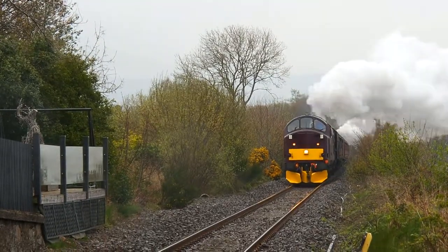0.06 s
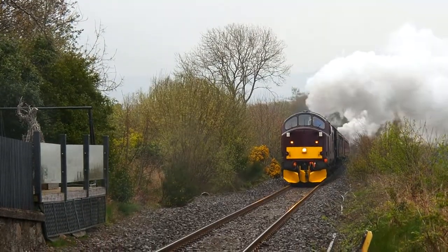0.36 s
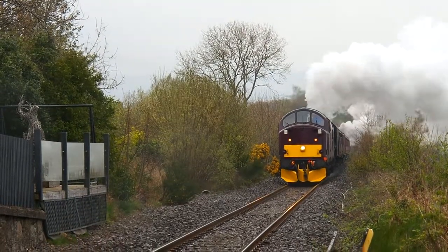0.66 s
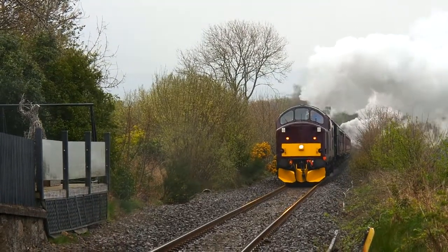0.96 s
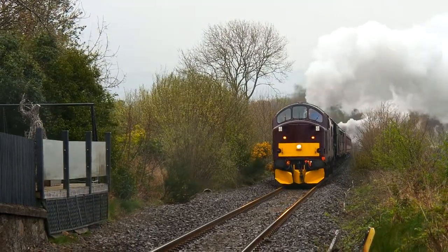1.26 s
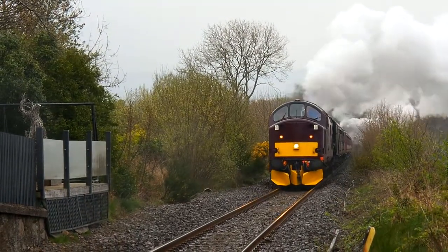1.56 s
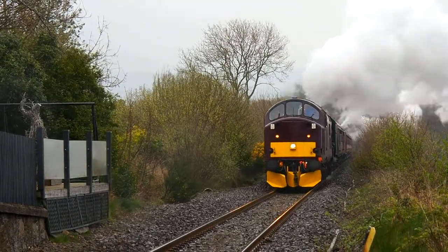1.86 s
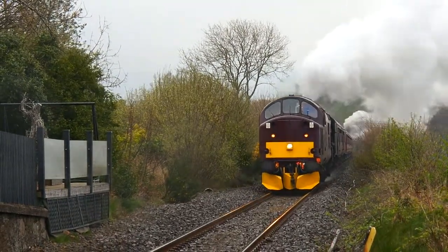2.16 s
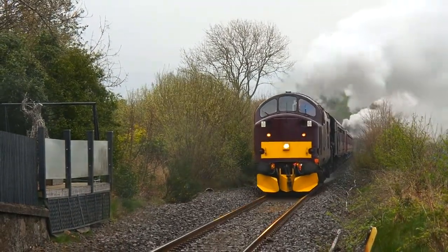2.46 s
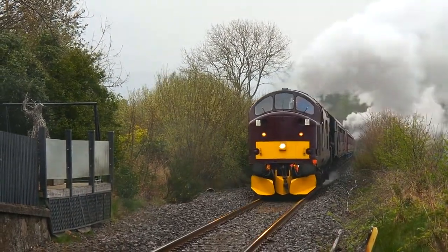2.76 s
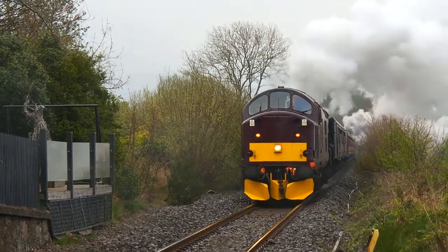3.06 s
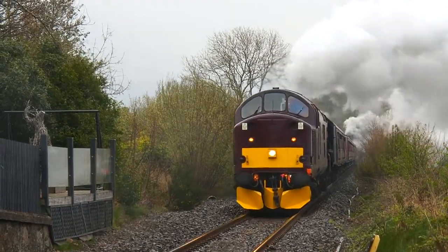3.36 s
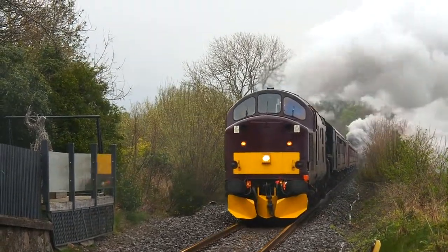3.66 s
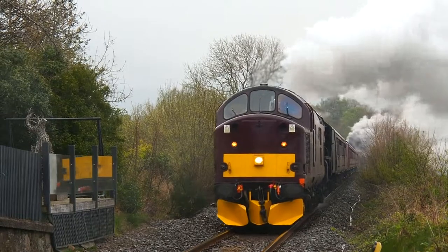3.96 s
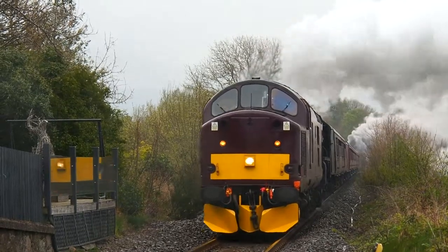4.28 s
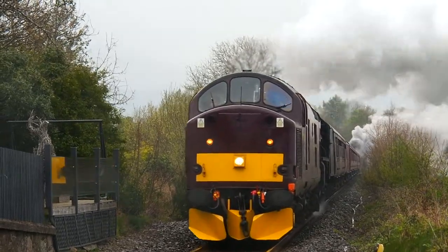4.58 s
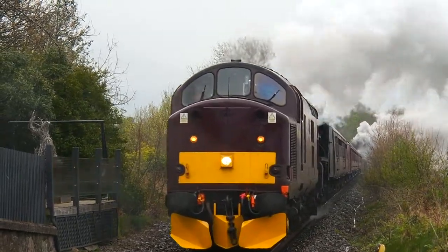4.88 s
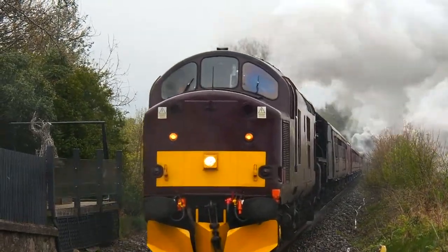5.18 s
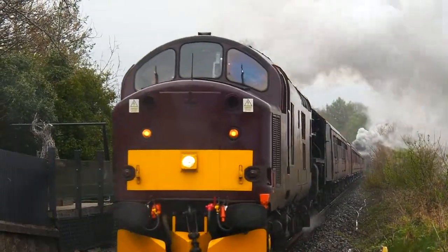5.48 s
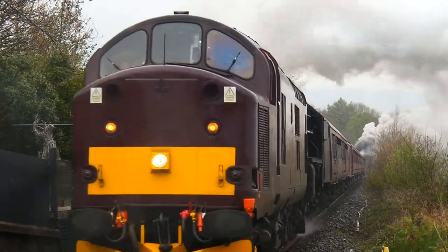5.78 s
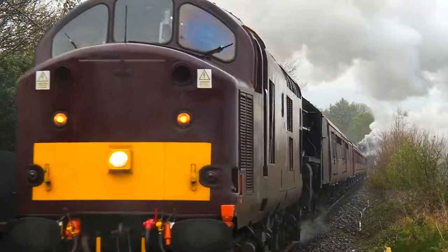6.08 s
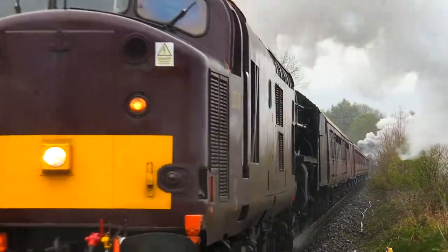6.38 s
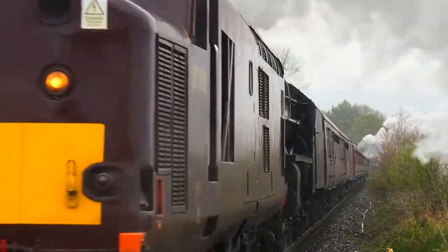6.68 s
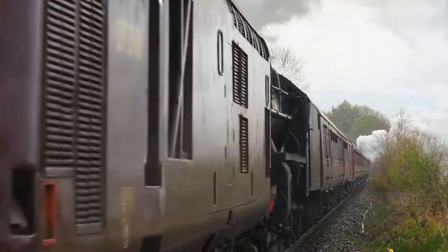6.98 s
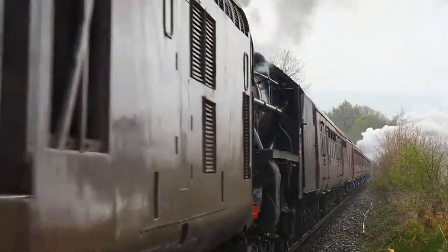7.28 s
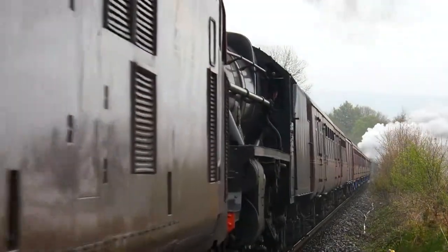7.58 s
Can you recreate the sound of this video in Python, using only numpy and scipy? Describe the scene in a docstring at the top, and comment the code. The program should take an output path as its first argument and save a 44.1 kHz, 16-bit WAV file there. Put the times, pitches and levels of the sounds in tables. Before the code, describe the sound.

A diesel locomotive approaches under heavy load, heard outdoors from beside the track. From the start its exhaust makes a deep, fast, uneven throb, fairly distant, with soft wheel roar and a gassy rasp above it. The sound grows steadily louder. The clatter surges briefly at about 1 second and again around 3.5 seconds, with a few light ticks, while faint gear and turbocharger whines come and go. From about 5.5 seconds the engine is close and a quick metallic rattle sets in. Between roughly 6.8 and 7.4 seconds the engine passes right by, with rapid knocks from its steel casing, sharp spits of gas and a bright pulsing hiss. Hard exhaust beats follow, and the wheel roar swells with a short rising ring around 7.5 seconds. It is still loud when the sound stops at about 7.7 seconds.

```python
"""Diesel locomotive at full power

A twelve-cylinder locomotive climbs towards the listener. Uneven firings throb in the exhaust once per
engine cycle; gas rasps and spits. Each source grows by its own distance law; the clatter comes in surges,
and gears and turbocharger sing faintly. The engine room rattles and knocks as it goes by, and the wheels
roar as the first bogie draws level."""
import sys
import numpy as np
from scipy import signal
from scipy.fft import rfft, irfft, next_fast_len
from scipy.io import wavfile
from scipy.ndimage import uniform_filter1d

SR = 44100
rng = np.random.default_rng(int(sys.argv[2]) if len(sys.argv) > 2 else 0)


def master_out(mix):
    """Clip the mix to full scale and print it as 16-bit PCM to the path in sys.argv[1]."""
    frames = np.transpose(np.atleast_2d(mix))
    ceiling = np.clip(frames, -1, 1)
    pcm = np.round(ceiling * 32767).astype(np.int16)
    wavfile.write(sys.argv[1], SR, pcm)


N = 340893
TIME = np.arange(N) / SR
FFT_SIZE, BURST_SIZE = next_fast_len(N), 2048
BIN_HZ = np.maximum(np.arange(FFT_SIZE // 2 + 1) * SR / FFT_SIZE, 1)
BURST_HZ = np.maximum(np.arange(BURST_SIZE // 2 + 1) * SR / BURST_SIZE, 1)
BURST_AGE_S = np.arange(BURST_SIZE) / SR
ENGINE_ROOM_S = (6.8, 7.35, 0.19)  # going by: start, end, edge


# Each row, in firing order: blow strength in dB far, near.
CYLINDERS = [(-7.5, -8), (-4.5, -4), (-3, -8), (-1.75, -5), (-10.5, -5), (-5.5, -2), (0.5, -11), (-7, -5),
             (0, -15), (-14.5, -8), (-7, -8), (-7.5, -2)]
# Each row (far, near): first firing and second-bank lag in firing gaps, pipe smear in radians.
FIRING = [(.4805, .645, .032), (.399, .386, .029)]

def firing_sum(order, near):
    """Phasor of twelve blows at one engine order; the banks fire unevenly, the pipes smear each blow."""
    first, bank_lag, smear = FIRING[near]
    slot = np.arange(len(CYLINDERS))
    firings = (slot + first + bank_lag * (slot % 2)) / len(CYLINDERS)
    total = np.sum(undb(CYLINDERS)[:, near] * np.exp(-2j * np.pi * order * firings))
    return total * np.exp(-1j * smear * (order - 20) ** 2)


# Each row, from engine order 5 up: relative level in dB far, near, alongside.
ORDER_LEVELS = [(-36.0, -36.0, -36.0), (-15.5, -16, -20.0), (-19, -18, -36.0), (-30.0, -26, -34.0),
                (-3.5, -9, -16.0), (-12, -18.0, -19), (-21, -20, -25.0), (-1.0, -6.5, -6.0),
                (-23, -9.5, -16), (-10.5, -8, -12.0), (-13, -16, -7), (-14.5, -5.5, -10.0),
                (-28.5, -10, -3), (-8.5, -17, -11), (0.0, 0.0, 0.5), (-6.5, -15, -21), (-1.5, -2.5, -3.5),
                (-8.5, -11, -11), (-5.5, -6.5, -3.5), (-11.5, -18, -12.0), (-15.0, -21, -19),
                (-12, -19, -7), (-9.5, -22, -7), (-3, -11.5, -5.5), (-17.5, -17, -6.5), (-17, -16.5, -7.0),
                (-18.5, -11, -11.5), (-18, -8.5, -5.5), (-39, -18, -15), (-20.5, -26.0, -32),
                (-25.5, -18.5, -19), (-30, -21.5, -18)]
# Highest order of each silencer register: bass, boom, bark.
TOP_ORDERS = [14, 24, 36]

def exhaust_tones(cycle, flutter_db=0.94, chug_db=0.7, alongside_s=6.9, blend_s=0.07):
    """Bass, boom and bark: the firing pattern sets each order's phase, the silencer its strength."""
    close, alongside = closeness(), closeness(alongside_s, blend_s)
    tones, power = np.zeros((3, N)), np.zeros((3, N))
    for order, (far_db, near_db, side_db) in enumerate(ORDER_LEVELS, 5):
        far, near = firing_sum(order, near=0), firing_sum(order, near=1)
        phase = np.angle(far) + close * np.angle(near / far)
        gain = undb(far_db + close * (near_db - far_db) + alongside * (side_db - near_db))
        register = np.searchsorted(TOP_ORDERS, order)
        tones[register] += gain * undb(flutter_db * walk(6)) * np.cos(2 * np.pi * order * cycle + phase)
        power[register] += gain ** 2 / 2
    return tones / np.sqrt(power) * undb(chug_db * walk(8))


# One spectrum per register. Each row: frequency in Hz, relative density in dB.
TURBULENCE = [
    [(28, -27), (48, -13), (65, -9), (100, 0), (118, -9.5)],
    [(115, -5), (165, -2.5), (190, -3.5)],
    [(192, -2.5), (215, 0.5), (240, -0.5), (265, -11.5), (300, -23.5), (400, -36)],
]
# Each row, one per register: turbulence against tone in dB far, near.
TURBULENCE_DB = [(-14.5, -7), (-9.5, -6.5), (-3, -0.5)]
# Each row: time in seconds, bass gain in dB.
BASS_SWELL = [(1.1, -2), (1.45, -0.5), (4, 1.4), (5.7, -2.5), (6.15, 2.5), (6.85, -1.5), (7.25, 2.5),
              (7.4, 1)]
# Each row: start and end in seconds, boom and bark gain in dB.
LULLS_AND_LIFTS = [(5.748, 6.25, 0, 2), (6.486, 6.783, 0, 3.5), (6.796, 6.926, -1.5, -0.5),
                   (7.05, 7.174, -2.5, -4.5), (7.176, 7.382, -3.5, 0), (7.543, 7.59, -2.5, -3.5),
                   (7.638, 7.717, 1.5, 0)]

def exhaust(cycle, throb=0.26):
    """Firing tones plus turbulent gas that rushes in each chug."""
    tones, close = exhaust_tones(cycle), closeness()
    chugs = unit(np.abs(uniform_filter1d(tones[1] ** 2, size=900)) ** (throb / 2))
    boom_db, bark_db = sum(np.outer(db, bout(start, end, 0.03)) for start, end, *db in LULLS_AND_LIFTS)
    gains = [passing(at_s=7, width_s=1.24, db=-24.5, fall=1.02) * undb(curves(BASS_SWELL)[0]),
             passing(at_s=7.5, width_s=1.57, db=-17, fall=1.5) * undb(boom_db),
             passing(at_s=7.5, width_s=0.21, db=-16, fall=0.78) * undb(bark_db)]
    out = 0
    for tone, gain, spectrum, (far_db, near_db) in zip(tones, gains, TURBULENCE, TURBULENCE_DB):
        rush_gain = undb(far_db + close * (near_db - far_db))
        rush = rush_gain * noise(spectrum, white() * chugs)
        direct = np.array([tone, np.zeros(N)])
        out += gain * (direct + rush) / np.sqrt(1 + rush_gain ** 2)
    return out


# Each row: start in seconds, peak in dB, ring in Hz.
HARD_FIRINGS = [(7.021, -9.5, 225), (7.204, -8.5, 237), (7.341, -8.5, 245), (7.383, -10, 170),
                (7.452, -4.5, 159), (7.510, -7, 201), (7.593, -7.5, 213), (7.642, -2, 165.6)]

def with_hard_firings(throb, swell_s=0.011, takeover=0.54):
    """A hard firing rings the silencer for a few cycles and takes over from the steady throb."""
    out, age = throb.copy(), np.arange(int(SR * 0.07)) / SR
    envelope = (age / swell_s * np.exp(1 - age / swell_s)) ** 2
    for s, db, hz in HARD_FIRINGS:
        span = slice(int(s * SR), int(s * SR) + len(age))
        out[:, span] *= 1 - takeover * envelope
        out[0, span] += undb(db) * envelope * np.sin(2 * np.pi * hz * age)
    return out


# Each row: frequency in Hz, relative density in dB.
WHEELS_FAR = [(360, -45), (620, -10), (662, -18), (720, 0), (841, 1), (919, -1), (1170, -6.5), (1410, -7),
              (1540, -4), (1640, -6), (1810, -16.5), (1900, -12.5), (2470, -23), (4180, -120)]
WHEELS_NEAR = [(360, -39), (560, -16), (620, -13.5), (710, -3), (841, -0.5), (1050, -6), (1150, -3.5),
               (1290, -8.5), (1570, -7.5), (1780, -11), (1900, -11), (2470, -36), (4180, -120)]

def wheel_roar(cycle):
    """Midrange roar; gives way to single knocks beside the engine room."""
    roar = clatter(cycle, WHEELS_FAR, WHEELS_NEAR, depth=0.24, flicker_db=0.48, ring_db=1)
    dip = undb(-4 * bout(*ENGINE_ROOM_S))
    return roar * dip * passing(at_s=7.5, width_s=0.6158, db=-26.5, fall=1.1131)


# Each row: start and end in seconds, first and last pitch in Hz, level in dB.
WHEEL_GLIDES = [(0.27, 0.378, 852, 770, -49), (1.0, 1.328, 830, 888, -49.5), (3.533, 3.61, 803, 883, -47),
                (7.501, 7.72, 699.5, 1099, -30.5)]

def wheel_glides(width_hz=110, edge_s=0.096):
    """The wheel roar gathers briefly in a narrow, sliding resonance."""
    out, lowpass = 0, signal.butter(2, width_hz / 2, fs=SR, output="sos")
    for start, end, from_hz, to_hz, db in WHEEL_GLIDES:
        hz = np.interp(TIME, [start, end], [from_hz, to_hz])
        carrier = np.exp(2j * np.pi * np.cumsum(hz) / SR)
        band = (signal.sosfilt(lowpass, white() + 1j * white()) * carrier).real
        out += unit(band) * undb(db) * bout(start, end, edge_s)
    return out


# Each row: frequency in Hz, relative density in dB.
BODY_FAR = [(270, -15), (305, -11.5), (345, -7.5), (400, -10.5), (432, -6), (482, -9.5), (554, -16.5),
            (620, -14), (680, -16)]
BODY_NEAR = [(270, -12.5), (315, -4.5), (350, -9), (395, -11), (436, -6), (458, -13.5), (482, -8),
             (554, -20), (620, -17.5), (680, -26)]

def body_rumble(cycle):
    """Low, nearly steady clatter of the body."""
    rumble = clatter(cycle, BODY_FAR, BODY_NEAR, depth=0.069, flicker_db=0.3, ring_db=0)
    return rumble * passing(at_s=7.5, width_s=0.58, db=-30.5, fall=0.98)


# Each row: frequency in Hz, relative density in dB.
RASP_FAR = [(1750, -2), (1830, -14), (1950, 0), (2130, 2.5), (2420, -0.5), (2730, 1), (2900, -5),
            (3120, -13), (3550, -10.5), (4050, -18), (4800, -20)]
RASP_NEAR = [(1750, -8), (1900, -3), (2130, 4), (2400, -1), (2700, -3.5), (2960, -11.5), (3350, -8),
             (3760, -24), (4800, -26)]

def gas_rasp(cycle):
    """Gas rasps in time with the puffs."""
    rasp = clatter(cycle, RASP_FAR, RASP_NEAR, depth=0.26, flicker_db=0.96, ring_db=1.84)
    return rasp * passing(at_s=7, width_s=1.51, db=-34.5, fall=1.33)


# Each row: frequency in Hz, relative density in dB.
HISS = [(2120, -21), (3600, 1.5), (3990, -1), (4850, -0.5), (5290, -6), (6120, -8.5), (7390, -6),
        (9210, -11), (10100, -9.5), (11500, -24), (12800, -33), (14500, -36), (15500, -42)]

def gas_hiss(cycle):
    """Pulsed hiss; gives way slightly to single spits beside the engine room."""
    hiss = clatter(cycle, HISS, HISS, depth=0.33, flicker_db=0.95, ring_db=2)
    dip = undb(-0.5 * bout(*ENGINE_ROOM_S))
    return hiss * dip * passing(at_s=7, width_s=1.07, db=-42, fall=1.56)


# Each row: frequency in Hz, relative density in dB.
FIZZ = [(10000, 3), (11200, 1), (12500, -16), (14300, -14), (15500, -21)]

def fizz():
    """The finest hiss carries only a few metres."""
    return noise(FIZZ, white()) * passing(at_s=7.18, width_s=0.22, db=-54.5, fall=1.9)


# Each row: start and length in seconds, wheel, rasp and hiss gain in dB.
SURGES = [(0.952, 0.48, 2, 3, 2), (2.458, 0.68, 0, -2, 0), (3.276, 0.19, 2.5, 3, 0.5),
          (3.488, 0.15, 4, 6, 5.5), (3.662, 0.16, 1.5, 3, 3.5), (3.903, 0.2, 1.5, 2.5, 1.5),
          (4.597, 0.48, 0.2, 1.5, 1.5), (5.65, 0.38, 3, 1.5, 2), (6.238, 0.11, 0, 0.5, 0.5),
          (6.4, 0.13, -0.5, -1.5, -2.5), (6.883, 0.14, 3.5, 2.5, 1), (7.417, 0.12, -0.5, 2.5, -1),
          (7.569, 0.16, 4.5, 2.5, 2)]

def surging_clatter(cycle, edge_s=0.14):
    """Wheel roar, rasp and hiss swell or sink for a moment."""
    surge_db = sum(np.outer(db, bout(start, start + length, edge_s)) for start, length, *db in SURGES)
    wheel_gain, rasp_gain, hiss_gain = undb(surge_db)
    return wheel_roar(cycle) * wheel_gain + gas_rasp(cycle) * rasp_gain + gas_hiss(cycle) * hiss_gain


# Relative strength in dB of each of the near bank's six puffs.
PUFFS_DB = [-2.5, -5, -0.5, -5.5, -1, -3]

def gas_puffs(cycle, lead_gaps=0.19, decay_gaps=0.84, scatter_db=3):
    """Envelope that jumps at each near-bank firing and decays until the next; rms 1."""
    beat = (cycle + 1) * len(PUFFS_DB) + lead_gaps
    index = beat.astype(int)
    puff_db = np.take(PUFFS_DB, index, mode="wrap") + scatter_db * rng.standard_normal(index[-1] + 1)[index]
    return unit(uniform_filter1d(undb(puff_db) * np.exp(-(beat % 1) / decay_gaps), size=60))


def crank_noise(cycle, repeat_share=0.1):
    """Noise that partly repeats on every crankshaft turn, two turns to a cycle."""
    turn_hz = 2 * CYCLE_RATE[0][1]
    place = (2 * cycle % 1 * SR / turn_hz).astype(int)
    return np.sqrt(repeat_share) * white()[:, place] + np.sqrt(1 - repeat_share) * white()


def panels(source, ring_db, spacing_hz=45, shift_hz=0.552):
    """Steel panels add narrow resonances; which ones stand out changes as the train moves."""
    modes_hz = np.arange(1024) * spacing_hz
    spectrum, angle = rfft(source, FFT_SIZE), 2 * np.pi * shift_hz * TIME
    ripples = [np.interp(BIN_HZ, modes_hz, rng.standard_normal(len(modes_hz))) for _ in range(2)]
    one, other = (irfft(spectrum * ripple, FFT_SIZE)[:, :N] for ripple in ripples)
    return source + (undb(ring_db) - 1) * (np.cos(angle) * one + np.sin(angle) * other)


def clatter(cycle, far, near, depth, flicker_db, ring_db):
    """Crank noise pulsed by the puffs; close by, the beat deepens and the near spectrum takes over."""
    close = closeness()
    pulsed_share = depth * (1 + close) / 2
    envelope = unit(1 - pulsed_share + pulsed_share * gas_puffs(cycle))
    source = crank_noise(cycle) * envelope * undb(flicker_db * walk(22))
    rung = panels(source, ring_db)
    return (1 - close) * noise(far, rung) + close * noise(near, rung)


# Each row: mode frequency and width in Hz, relative level in dB.
CASING_MODES = [(807, 38, 3), (872, 27, 4.5), (1526, 135, -7), (2005, 135, -5.5)]
# Each row: start in seconds, level in dB, lowest mode in Hz, upper-mode gain in dB.
KNOCKS = [(3.358, -36, 840, -3), (3.533, -37, 855, -4), (5.757, -32, 810, 14), (6.020, -27, 840, 2),
          (6.301, -28, 845, 19), (6.583, -31, 805, -4), (6.772, -34, 815, 4), (6.816, -26, 810, 7),
          (6.859, -22, 799, -3), (6.901, -23.5, 810, -5), (6.943, -21.5, 830, -1), (6.986, -24.5, 775, 7),
          (7.011, -23.5, 834, 4), (7.070, -21.5, 800, 6), (7.115, -24, 790, 3), (7.161, -26.5, 770, -6),
          (7.197, -20, 827, -9), (7.241, -28, 764, -1), (7.285, -24.5, 776, 0), (7.326, -23.5, 765, 15),
          (7.370, -29, 840, 7)]

def casing_knocks(near_push_s=0.0029, far_push_s=0.0078, detune=0.017, thin_hz=450, dull_hz=2900):
    """Brief rough pushes ring the casing, each a little differently; distance smears them."""
    out, hz, close = np.zeros((2, N)), BURST_HZ, closeness()
    # Little bass escapes, and the top falls away steeply.
    radiated = (1j * hz / (thin_hz + 1j * hz)) ** 3 / (1 + 1j * hz / dull_hz) ** 4
    for s, db, pitch_hz, upper_db in KNOCKS + rattle():
        start = int(s * SR)
        push_s = far_push_s + close[start] * (near_push_s - far_push_s)
        push = rng.standard_normal((2, BURST_SIZE)) * np.exp(-BURST_AGE_S / push_s)
        shifts = pitch_hz / CASING_MODES[0][0] * (1 + detune * rng.standard_normal(len(CASING_MODES)))
        casing = 0
        for (mode_hz, width_hz, mode_db), shift in zip(CASING_MODES, shifts):
            gain = undb(mode_db + upper_db * (mode_hz > CASING_MODES[1][0]))
            casing += gain / (1 + 1j * (hz ** 2 - (mode_hz * shift) ** 2) / (hz * width_hz))
        ring = irfft(rfft(push) * casing * radiated)
        onset_rms = np.sqrt(np.mean(ring[:, :BURST_SIZE // 8] ** 2, axis=1, keepdims=True))
        out[:, start:start + BURST_SIZE] += undb(db) * ring / onset_rms
    return out


def rattle(start_s=5.579, scatter_db=3, spread=0.073, pitch_hz=880, upper_db=9, count=60):
    """Rows of light knocks at the puff rate, varying in strength and pitch."""
    times = start_s + np.arange(count) / (len(PUFFS_DB) * CYCLE_RATE[2][1])
    gain = passing(at_s=7, width_s=1, db=-34, fall=1.4)
    level_db = 20 * np.log10(np.interp(times, TIME, gain))
    return [(s, db + scatter_db * louder, pitch_hz * np.exp(spread * higher), upper_db)
            for s, db, (louder, higher) in zip(times, level_db, rng.standard_normal((count, 2)))]


# Each row: start in seconds, sizzle and crack level in dB.
SPITS = [(3.685, -51, -39), (6.685, -46, -40), (6.711, -41, -40), (6.882, -40, -32), (6.923, -37.5, -33),
         (6.941, -40, -35), (6.968, -45, -29), (6.986, -46, -36), (7.010, -35.5, -40), (7.054, -48, -39),
         (7.095, -46, -43), (7.138, -36, -29), (7.180, -37, -31), (7.222, -34.5, -34), (7.243, -42, -26),
         (7.267, -44, -26.5), (7.284, -44, -38), (7.309, -39.5, -34), (7.351, -36, -40), (7.393, -41, -36)]
# Each row: frequency in Hz, relative density in dB.
SIZZLE = [(4600, -7.5), (6200, -3), (7200, -2), (8500, -1), (10100, 1.5), (11200, -8), (12300, -25),
          (15000, -30)]
CRACK = [(900, -12), (1800, -2), (2550, -3), (3600, -7), (4700, -10)]
# Each row: start in seconds, level in dB, centre in Hz.
TICKS = [(1.555, -48, 3350), (1.594, -51, 4670), (1.766, -51, 4550), (3.558, -40, 2380), (3.581, -33, 2400)]

def spits_and_ticks(rise_s=0.00048, decay_s=0.0079, width_octaves=0.36):
    """Bright spits of gas and a few lone ticks: noise bursts that die in milliseconds."""
    out = np.zeros((2, N))
    envelope = np.exp(-BURST_AGE_S / decay_s) * (1 - np.exp(-BURST_AGE_S / rise_s))
    sizzles = [(s, db, colour(SIZZLE, BURST_HZ)) for s, db, _ in SPITS]
    cracks = [(s, db, colour(CRACK, BURST_HZ)) for s, _, db in SPITS]
    ticks = [(s, db, np.exp(-(np.log2(BURST_HZ / hz) / width_octaves) ** 2)) for s, db, hz in TICKS]
    for s, db, gains in sizzles + cracks + ticks:
        burst = unit(irfft(rfft(rng.standard_normal((2, BURST_SIZE))) * gains))
        start = int(s * SR)
        out[:, start:start + BURST_SIZE] += undb(db) * burst * envelope
    return out


def whine(hz, wobble, flutter_db):
    """A spinning part's tone, wavering in pitch and level."""
    tone = np.sqrt(2) * np.sin(2 * np.pi * np.cumsum(hz * (1 + wobble * walk(35))) / SR)
    return np.array([tone * undb(flutter_db * walk(11)) for _ in range(2)])


def gears_and_turbo():
    """Gears sing low, the turbocharger high, both louder as they near."""
    gears = whine(hz=433, wobble=0.0059, flutter_db=3)
    turbo = whine(hz=5013, wobble=0.00093, flutter_db=8)
    return (gears * passing(at_s=7.5, width_s=0.08, db=-36, fall=0.7)
            + turbo * passing(at_s=7.5, width_s=0.12, db=-56, fall=1.15))


# Each row: start and end in seconds, pitch in Hz, level in dB.
WHINES = [(0, 1.35, 875, -57.5), (0, 1.5, 488, -61.5), (1.25, 1.56, 5013, -73), (1.35, 1.86, 432.7, -54.5),
          (3.2, 5.0, 740, -54), (4.0, 4.9, 433.6, -51.5), (4.55, 4.4, 330, -49), (5.1, 7.4, 477, -51),
          (6.2, 6.9, 429.6, -44.5), (7.44, 7.53, 478, -33)]

def faint_whines(fade_s=0.15):
    """Faint tones come and go."""
    return sum(whine(hz, wobble=0.002, flutter_db=3.5) * undb(db) * bout(start, end, fade_s)
               for start, end, hz, db in WHINES)


# Each row: frequency in Hz, relative density in dB.
AIR = [(30, -5.5), (500, -4.5), (3000, -16), (5000, -22.5), (6000, -19.5), (6600, -25.5),
       (10000, -26.5), (15500, -29.5)]

def open_air(db=-54.5):
    """Steady background noise."""
    return undb(db) * noise(AIR, white())


# Each row: frequency in Hz, left minus right in dB.
BALANCE = [(60, -2.5), (110, -2.8), (200, -4), (380, -8.5), (700, -3.5), (1100, 0), (1700, -1.5),
           (2150, -11), (2700, -11), (3400, -1), (4400, 8), (6000, 15), (9500, 17), (13000, 5)]
# Each row: frequency in Hz, left lead in radians.
LEFT_LEAD = [(60, -0.22), (250, 0.48), (690, 0.7), (1030, 1.43), (1550, 1.13), (2330, 1.8), (3100, 3.1),
             (3900, 2.5), (6000, 2), (9000, 1), (15000, -17)]
# Each row: frequency in Hz, left-right coherence from 0 to 1.
COHERENCE = [(130, 0.98), (250, 1), (500, 0.55), (1000, 1), (2000, 0.33), (4000, 0.25), (10000, 0.17)]

def stereo(direct, scattered):
    """Direct sound as mid, scattered sound as side; left and right differ in level and phase."""
    tilt, lead = undb(across(BALANCE, BIN_HZ) / 2), across(LEFT_LEAD, BIN_HZ)
    alike = across(COHERENCE, BIN_HZ)
    mid = rfft(direct, FFT_SIZE) * np.sqrt(1 + alike)
    side = rfft(scattered, FFT_SIZE) * np.sqrt(1 - alike)
    left, right = (mid + side) * tilt * np.exp(1j * lead), (mid - side) / tilt
    mono_gain = np.sqrt((tilt ** 2 + tilt ** -2 + 2 * alike * np.cos(lead)) / 2)
    return irfft(np.array([left, right]) / mono_gain, FFT_SIZE)[:, :N]


def passing(at_s, width_s, db, fall):
    """Gain of a source going by at steady speed: db when nearest, at at_s; fall=1 is the 1/r law."""
    relative_distance = np.hypot(1, (TIME - at_s) / width_s)
    return undb(db) / relative_distance ** fall


def closeness(midpoint_s=5.16, blend_s=0.32):
    """0 while the locomotive is far off, 1 once it is close."""
    return 1 / (1 + np.exp((midpoint_s - TIME) / blend_s))


def bout(start, end, edge_s):
    """Trapezoid gate, slopes centred on start and end."""
    return np.clip(np.minimum(TIME - start, end - TIME) / edge_s + 0.5, 0, 1)


def walk(rate_hz):
    """Smooth random drift, spread near 1."""
    hold = int(SR / rate_hz)
    steps = np.repeat(rng.standard_normal(N // hold + 2), hold)[rng.integers(hold):]
    return 1.21 * uniform_filter1d(steps, hold)[:N]


def white():
    """Two unrelated white noises."""
    return rng.standard_normal((2, N))


def noise(spectrum, source):
    """Colour a noise source; rms 1."""
    return unit(irfft(rfft(source, FFT_SIZE) * colour(spectrum, BIN_HZ), FFT_SIZE)[:, :N])


def colour(spectrum, hz):
    """Gains of a spectrum, with steep skirts outside it."""
    skirts = np.minimum(hz / spectrum[0][0], 1) ** 6 * np.minimum(spectrum[-1][0] / hz, 1) ** 6
    return undb(across(spectrum, hz)) * skirts


def across(points, hz):
    """Interpolate (Hz, value) points in log frequency."""
    points_hz, values = np.transpose(points)
    return np.interp(np.log(hz), np.log(points_hz), values)


def curves(table):
    """Interpolate each value column in time."""
    times, *columns = np.transpose(table)
    return [np.interp(TIME, times, column) for column in columns]


def undb(db):
    """Decibels to gain."""
    return 10 ** (np.asarray(db) / 20)


def unit(x):
    """Scale to rms 1."""
    return x / np.sqrt(np.mean(x ** 2))


# Each row: time in seconds, four-stroke cycle rate as heard in Hz.
CYCLE_RATE = [(0, 7.821), (5.8, 7.823), (6.4, 7.812), (7.73, 7.805)]

def scene():
    """The engine cycle drives exhaust and clatter; open air lies under the train."""
    cycle = np.cumsum(curves(CYCLE_RATE)[0]) / SR
    train = with_hard_firings(exhaust(cycle))
    train += body_rumble(cycle) + surging_clatter(cycle) + fizz() + wheel_glides()
    train += gears_and_turbo() + faint_whines() + spits_and_ticks() + casing_knocks()
    fade = np.clip(np.minimum(TIME, TIME[-1] - TIME) / 0.004, 0, 1)
    direct, scattered = train * fade
    return stereo(direct, scattered) + open_air()


def record(dry):
    """Round the highest peaks; low-pass at 15650 Hz."""
    rounded = dry / (1 + dry ** 6) ** (1 / 6)
    return signal.sosfilt(signal.ellip(10, 0.1, 90, 15650, fs=SR, output="sos"), rounded)


dry = scene()
out = record(dry)
master_out(out)
```